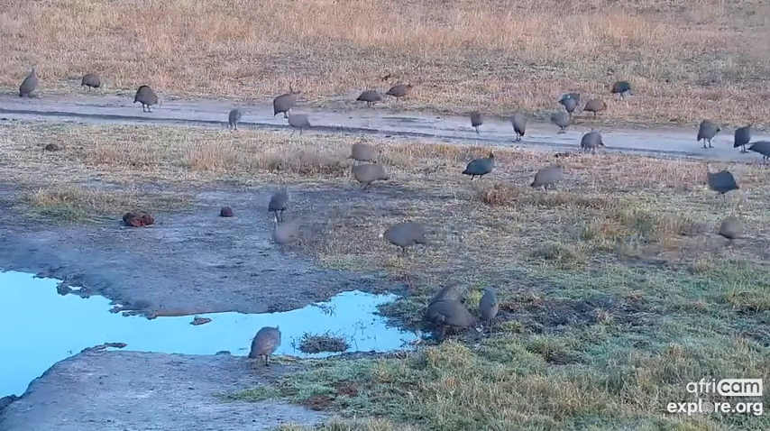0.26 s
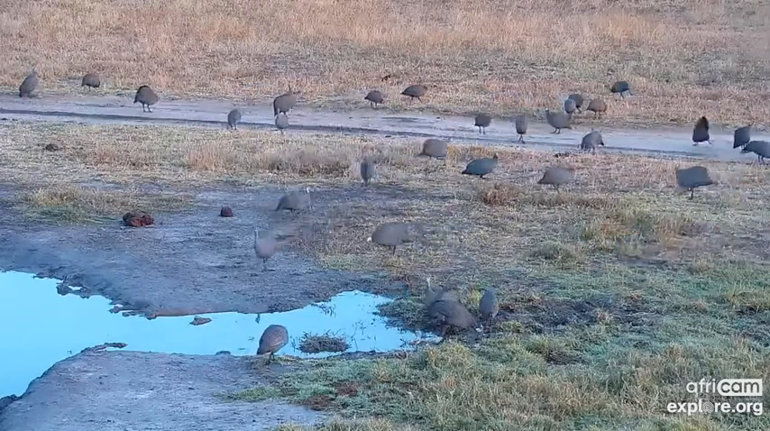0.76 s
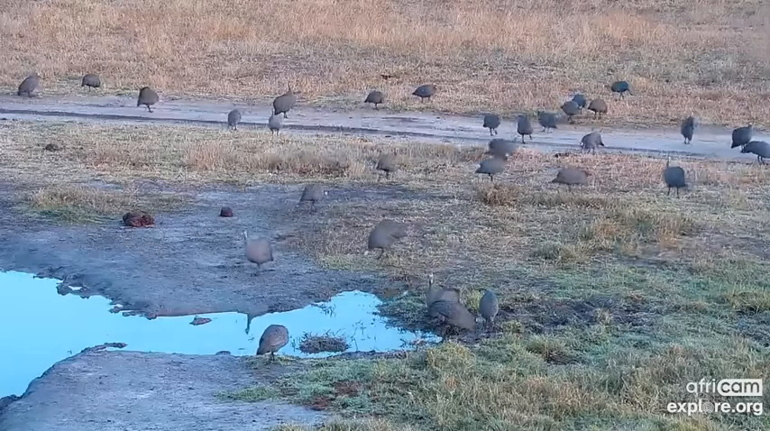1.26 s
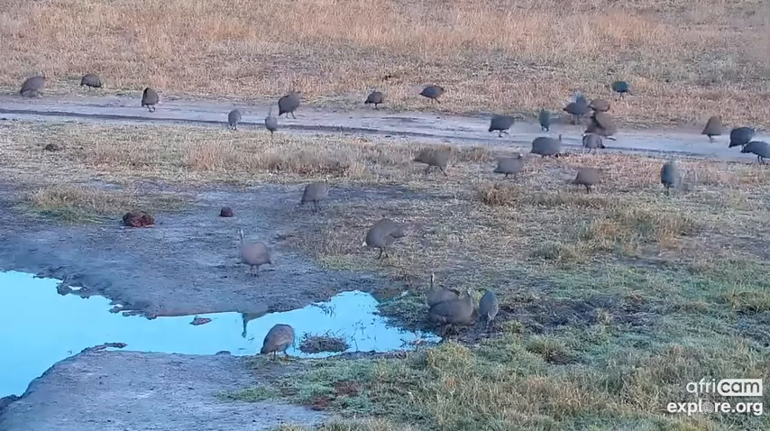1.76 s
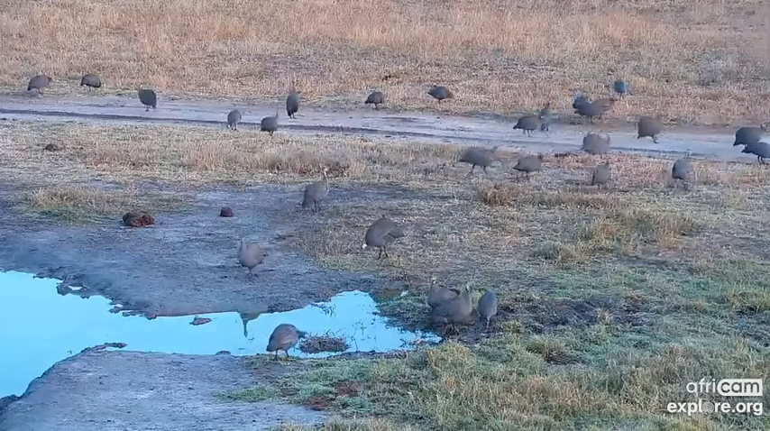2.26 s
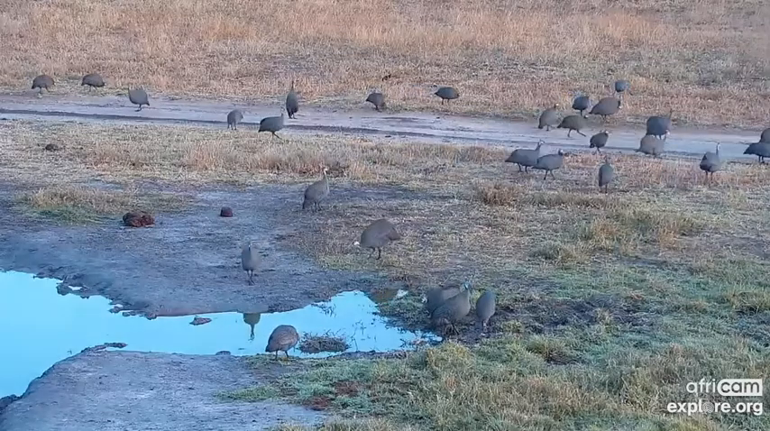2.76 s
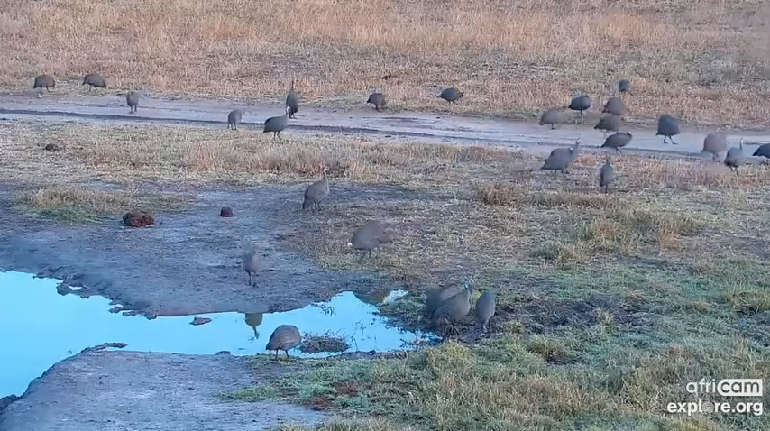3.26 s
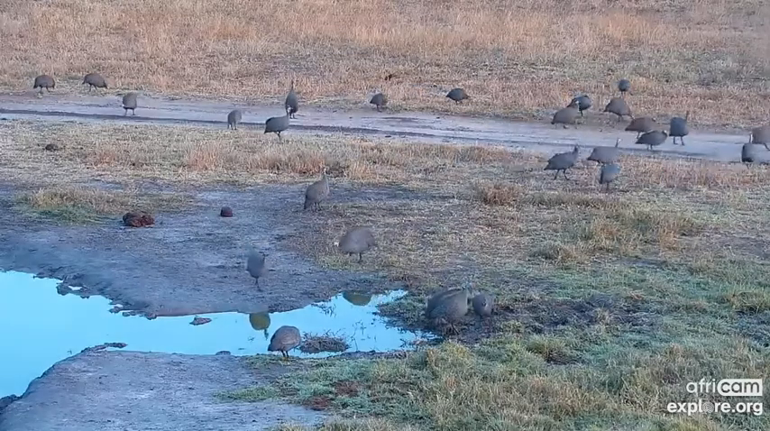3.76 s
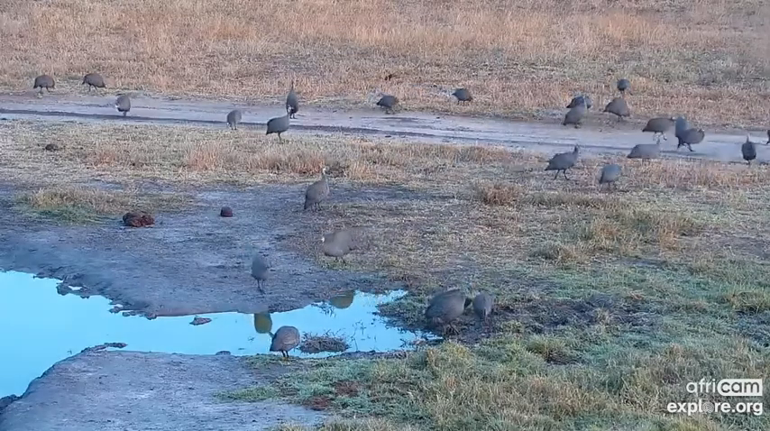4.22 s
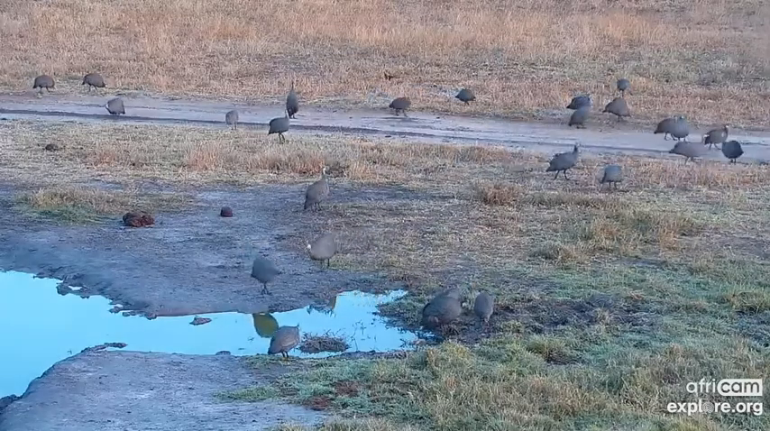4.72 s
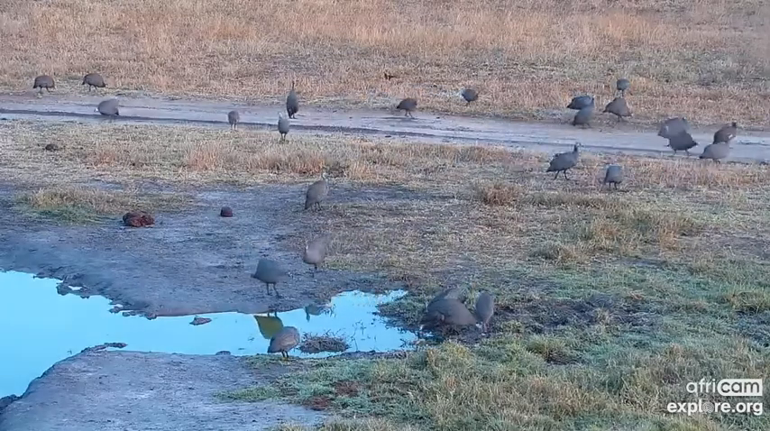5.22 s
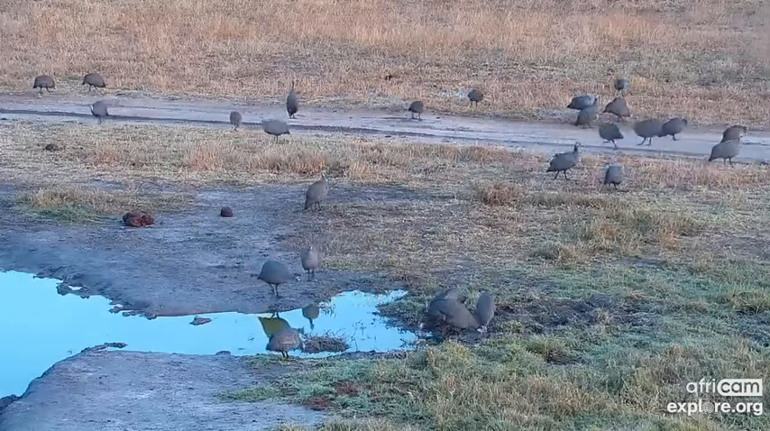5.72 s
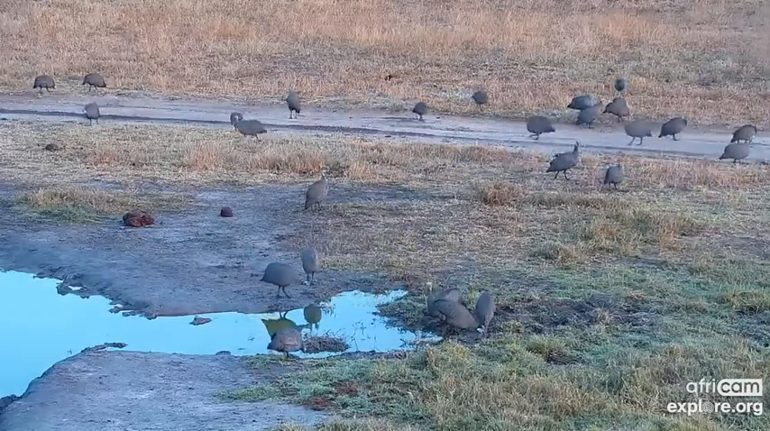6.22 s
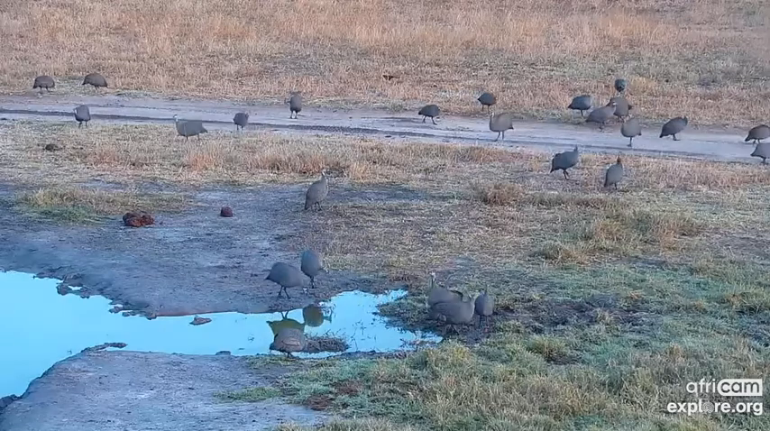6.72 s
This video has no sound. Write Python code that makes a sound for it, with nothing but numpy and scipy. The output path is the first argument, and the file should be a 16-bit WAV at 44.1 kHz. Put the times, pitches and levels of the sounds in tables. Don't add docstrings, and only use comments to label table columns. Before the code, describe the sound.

Open bush with a flock of guineafowl: six evenly spaced harsh chirps from one near bird, a gap filled by small-bird twitter, three more chirps mixed with clucks, then a sparser stretch and one last chirp near the end. Soft sustained calls swell behind. Beaks and feet tick on dry ground, echoes are short and diffuse, and a far motor drones steadily underneath, captured by an outdoor microphone.

```python
import sys
import numpy as np
from scipy import signal
from scipy.fft import rfft, irfft
from scipy.io import wavfile
from scipy.ndimage import uniform_filter1d

SR = 44100
rng = np.random.default_rng(int(sys.argv[2]) if len(sys.argv) > 2 else 0)


def magnitude_from_level(level_db):
    exponent = np.asarray(level_db, float) / 20
    return 10 ** exponent


def bounce(signal):
    frames = np.transpose(np.atleast_2d(signal))
    limited = np.clip(frames, -1, 1)
    pcm = np.round(limited * 32767).astype(np.int16)
    wavfile.write(sys.argv[1], SR, pcm)


N = 307818

# frequency in Hz, gain in dB.
BEAK = [(1000, 0), (9000, 0)]


def at_hz(points, hz):
    points = np.array(points)
    return np.interp(np.log(hz), np.log(points[:, 0]), points[:, 1])


def drift(size, rate):
    r = np.exp(-2 * np.pi * rate / SR)
    settle = 3000
    slow = signal.lfilter([1], [1, -2 * r, r * r], rng.standard_normal(size + settle))[settle:]
    return slow * np.sqrt((1 - r * r) ** 3 / (1 + r * r))


def band(x, low_hz, high_hz):
    return signal.sosfilt(signal.butter(2, [low_hz, high_hz], "band", fs=SR, output="sos"), x)


def add(out, s, sound):
    at = round(s * SR)
    sound, at = sound[max(-at, 0):], max(at, 0)
    out[at:at + len(sound)] += sound[:N - at]


def note(rows, throat, count, wobble, flutter_db, flutter_hz, breath_db, breath_hz):
    s, hz, level_db = np.transpose(rows)
    t = np.arange(s[0], s[-1], 1 / SR)
    pitch = uniform_filter1d(np.interp(t, s, hz), size=90) * (1 + wobble * drift(len(t), 137))
    phase = 2 * np.pi * (np.cumsum(pitch) / SR + rng.random())
    orders = np.arange(1, count + 1)[:, None]
    gains = magnitude_from_level(at_hz(throat, orders * pitch))
    gains = gains / np.sqrt(np.sum(gains ** 2, axis=0))
    flutter = magnitude_from_level(flutter_db * np.array([drift(len(t), flutter_hz) for k in range(count)]))
    cleanness = np.minimum(2 * orders / count, 1) ** 2
    noise = np.array([drift(len(t), breath_hz) for k in range(count)])
    breath = 1 + magnitude_from_level(breath_db) * cleanness * noise
    spread = orders ** 2 * np.pi / count
    tone = np.sqrt(2) * np.sum(gains * flutter * breath * np.sin(orders * phase + spread), axis=0)
    edge = np.clip(np.minimum(t - s[0], s[-1] - t) / 0.0025, 0, 1)
    return tone * edge * np.interp(t, s, magnitude_from_level(level_db / 2)) ** 2


def tick(level_db, low_hz, high_hz, decay_s):
    t = np.arange(2000) / SR
    swell = t / decay_s * np.exp(-t / decay_s)
    return magnitude_from_level(level_db) * band(rng.standard_normal(len(t)) * swell, low_hz, high_hz)


def near_bird():
    # start in seconds, length in seconds, top pitch in Hz, level in dB, sag by the end in dB.
    chirps = [
        (-.008, 0.034, 1872, -11, 9.5),
        (.407, 0.037, 1890, -11.5, 6.5),
        (0.821, 0.041, 1895, -13, 6),
        (1.268, 0.035, 1862, -8.5, 9.5),
        (1.698, 0.038, 1834, -10.5, 6.5),
        (2.116, 0.032, 1795, -10, 5.5),
        (3.474, .026, 1983, -11, 0.5),
        (3.921, 0.032, 1980, -9.5, 1.5),
        (4.331, 0.033, 1902, -10.5, 9.5),
        (6.588, 0.022, 1758, -11.5, -1),
    ]
    # frequency in Hz, gain in dB.
    throat = [(1800, -11), (3700, -5.5), (5400, -1), (6000, -3.5), (7200, -2), (8000, -13), (9200, -16.5),
              (10700, -22), (12000, -6)]
    attack_s, rise_s, drop_s, release_s = 0.0028, 0.009, 0.008, 0.0049
    out = np.zeros(N)
    for s, length, hz, level_db, sag_db in chirps:
        end = s + length
        start_hz = 0.96 * hz
        last_hz = hz * (1 - 3.64 * (length - 0.021))
        rows = [(s, start_hz, level_db - 25),
                (s + attack_s, start_hz, level_db - 2),
                (s + rise_s, 0.99 * hz, level_db + 0.3),
                (s + 0.39 * length, hz, level_db),
                (end - drop_s, 0.594 * hz + 0.3934 * last_hz, level_db - 0.4 * sag_db),
                (end - release_s, last_hz, level_db - sag_db),
                (end, 0.93 * last_hz, level_db - 31)]
        add(out, s, note(rows, throat, count=6, wobble=0.006, flutter_db=2, flutter_hz=160,
                         breath_db=-9, breath_hz=380))
        add(out, end - 0.003, tick(-20, 2000, 4600, 0.0065))
        if 0 < s < 5:
            add(out, s - 0.0125, tick(3.9, 2180, 2500, 0.00068) + tick(-18.5, 3000, 6400, 0.0011))
            add(out, s + 0.00024, tick(-8, 1800, 8200, 0.00096))
    return band(out, 1300, 13000)


def clucks():
    # peak time in seconds, pitch in Hz, level in dB, length in seconds, third harmonic in dB.
    calls = [
        (3.026, 1814, -28.5, 0.015, -7),
        (3.561, 1637, -10, 0.012, -1.5),
        (3.956, 1870, -15, .011, 8),
        (4.206, 1846, -17.5, 0.013, -6),
        (4.302, 1643, -19.5, 0.011, -11),
        (4.808, 1663, -15.5, 0.0096, 5.5),
        (6.031, 1623, -16.5, 0.0087, 4),
        (6.376, 1650, -34, 0.013, -24),
        (6.688, 1630, -18.5, 0.013, -5),
    ]
    # frequency in Hz, gain in dB.
    cluck_throat = [(1700, -4), (3300, -2.5), (5000, 4), (6700, -21), (7400, -3), (7900, -27)]
    out = np.zeros(N)
    for s, hz, level_db, length, third_db in calls:
        throat = [(f, g + third_db * (k == 2)) for k, (f, g) in enumerate(cluck_throat)]
        rows = [(s - 0.45 * length, 1.08 * hz, level_db - 8),
                (s, hz, level_db),
                (s + 0.58 * length, 0.987 * hz, level_db - 4.5),
                (s + 0.5 * length, 0.52 * hz, level_db - 37)]
        add(out, rows[0][0], note(rows, throat, count=5, wobble=0.014, flutter_db=1, flutter_hz=200,
                                  breath_db=-11, breath_hz=900))
    return band(out, 1200, 13000)


def long_notes():
    # start in seconds, length in seconds, pitch in Hz, end level in dB, overtone gain in dB.
    calls = [
        (.44, 0.18, 1860, -44, 2),
        (1.207, 0.29, 1860, -39, 0),
        (2.138, 0.25, 1821, -35.5, 2),
        (3.027, 0.29, 1824, -36.5, -2),
        (4.991, 0.296, 1835, -41, -12),
        (5.884, 0.27, 1840, -37.5, -11),
        (6.797, 0.37, 1810, -32, 1),
    ]
    # frequency in Hz, gain in dB.
    long_throat = [(1850, 2), (3700, -18.5), (5500, -4), (7400, -15.5)]
    out = np.zeros(N)
    for s, length, hz, level_db, overtone_db in calls:
        rows = [(s, 1.045 * hz, level_db - 9),
                (s + 0.013, 1.04 * hz, level_db - 5),
                (s + 0.019, 0.985 * hz, level_db - 10),
                (s + 0.423 * length, 0.995 * hz, level_db - 4.5),
                (s + 0.9 * length, 1.01 * hz, level_db),
                (s + 1.04 * length, 1.015 * hz, level_db - 26)]
        throat = [(f, g + overtone_db * (f > 2 * hz - 500)) for f, g in long_throat]
        add(out, s, note(rows, throat, count=4, wobble=0.002, flutter_db=2.8, flutter_hz=20,
                         breath_db=-19, breath_hz=300))
    return band(out, 1200, 13000)


def ticks():
    # time in seconds, peak level in dB.
    strikes = [(1.072, -32), (1.588, -30), (2.884, -37), (3.043, -30), (3.318, -29), (3.797, -35),
               (3.8987, -32), (3.911, -25), (2.865, -37), (4.19, -30), (4.611, -29), (5.4525, -39),
               (5.562, -32), (6.134, -30), (6.518, -27.5), (6.863, -29.5)]
    out = np.zeros(N)
    for s, level_db in strikes:
        add(out, s - 0.001, tick(level_db + 9.5, 5200, 9800, 0.001))
    return out


def swoops():
    # time of the top in seconds, fall in seconds, top in Hz, level at the top and on the shelf in dB.
    calls = [
        (3.542, 0.015, 4860, -26, -17),
        (6.007, .023, 4950, -31.5, -5.5),
        (6.666, 0.031, 4660, -24.5, -23.5),
    ]
    shelf_hz, drop_hz = 4020, 3300
    out = np.zeros(N)
    for s, fall, top, top_db, db in calls:
        rows = [(s - 0.021, 0.62 * top, top_db - 22),
                (s - 0.009, 0.965 * top, top_db - 8),
                (s - 0.003, top, top_db),
                (s + 0.342 * fall, 0.95 * top, (top_db + db) / 2 - 1),
                (s + 0.404 * fall, shelf_hz, db),
                (s + 0.75 * fall, shelf_hz, db + 1),
                (s + 0.915 * fall, (shelf_hz + drop_hz) / 2, db - 11),
                (s + 0.927 * fall, drop_hz, db - 0.6),
                (s + fall + 0.006, drop_hz, db - 30)]
        add(out, rows[0][0], note(rows, BEAK, count=1, wobble=0.012, flutter_db=1.4, flutter_hz=120,
                                  breath_db=-15, breath_hz=600))
    return out + 0.015 * band(out ** 2, 5500, 11000)


def pipes():
    # start in seconds, length in seconds, hook in Hz, pitch in Hz, level in dB.
    calls = [(0.583, 0.091, 4050, 3690, -31), (0.701, 0.076, 3760, 3620, -32),
             (0.793, 0.098, 4020, 3625, -27), (0.908, 0.072, 4200, 3600, -29.5),
             (1.031, 0.073, 4200, 3670, -30), (4.371, 0.088, 3750, 3664, -30),
             (4.477, 0.075, 3900, 3680, -30.5), (4.58, 0.08, 3710, 3610, -32),
             (4.68, 0.069, 3660, 3510, -34), (4.869, 0.071, 4090, 3650, -33.5),
             (6.696, 0.047, 4110, 3716, -30), (6.728, 0.072, 3660, 3660, -28),
             (6.82, 0.1, 3630, 3610, -30.5), (6.939, 0.081, 3770, 3690, -27)]
    hook_s, sag = 0.0225, 0.011
    return [[(s, hook, db - 8.5),
             (s + hook_s, hz, db),
             (s + 0.63 * length, (1 - sag) * hz, db - 3),
             (s + length, (1 - 3.9 * sag) * hz, db - 44)]
            for s, length, hook, hz, db in calls]


def whistles():
    # start in seconds, length in seconds, from Hz, to Hz, level in dB.
    clear = [(-.01, 0.071, 2602, 2560, -35), (0.541, 0.14, 2096, 2290, -43), (1.18, .05, 2400, 2120, -58),
             (1.225, 0.12, 2100, 2370, -38.5), (0.778, .016, 4200, 4300, -44),
             (2.797, .02, 4800, 4870, -42), (2.379, 0.024, 4150, 4114, -40), (3.682, .032, 3000, 3030, -40),
             (3.713, 0.028, 3000, 2400, -41), (3.816, 0.026, 4550, 4360, -34),
             (4.823, 0.071, 3050, 2980, -47), (4.893, 0.15, 1300, 1280, -56.5),
             (5.164, 0.019, 5150, 5380, -41), (5.335, 0.02, 4550, 4550, -46),
             (6.143, .014, 4700, 6200, -50), (6.364, 0.014, 4000, 3930, -39),
             (6.299, 0.02, 4150, 4070, -38), (6.65, .024, 3500, 4300, -53),
             (1.077, 0.051, 3520, 3130, -36.5), (1.302, 0.056, 3480, 2986, -32),
             (2.401, 0.035, 3005, 3290, -35), (2.362, 0.23, 2730, 2600, -48.5),
             (0.98, 0.041, 3980, 3720, -28), (2.695, 0.13, 1130, 910, -45),
             (3.343, 0.024, 2500, 5300, -45.5), (3.739, .15, 2250, 2400, -46.5),
             (3.955, 0.022, 3600, 3410, -28.5), (4.77, 0.03, 4640, 4320, -33.5),
             (4.921, 0.04, 3520, 2770, -36), (4.958, 0.14, 2680, 2594, -40),
             (5.666, 0.065, 2234, 2384, -40.5), (4.165, 0.091, 3800, 3300, -33.5),
             (6.258, 0.059, 2100, 2147, -44.5), (6.318, 0.14, 2676, 2602, -39),
             (6.347, 0.063, 2220, 2400, -41.5), (6.762, 0.033, 1496, 1615, -45)]
    # start in seconds, length in seconds, from Hz, to Hz.
    faint = [(1.829, 0.037, 3400, 4100), (1.917, 0.045, 5100, 4670), (2.188, 0.053, 5100, 4450),
             (3.07, 0.082, 2300, 2460), (1.855, 0.019, 5100, 6900), (2.8, .025, 3900, 3900),
             (2.0, 0.037, 2700, 2530), (3.9, .05, 3900, 3600), (6.21, 0.037, 3600, 4000),
             (1.387, .1, 3350, 3330), (1.5, 0.13, 3450, 3900), (6.885, .03, 2800, 3600),
             (2.88, 0.053, 6200, 6720), (4.95, .012, 5200, 5500), (5.549, 0.029, 3550, 3580),
             (5.655, 0.039, 2700, 2800), (6.45, 0.027, 4000, 3800)]
    calls = [tuple(row) for row in clear] + [(*row, -51) for row in faint]
    edge = 0.13
    shape = [(0, 9), (edge, 0), (1 - edge, 0), (1, 9)]
    return [[(s + k * length, a + k * (b - a), db - loss) for k, loss in shape]
            for s, length, a, b, db in calls]


def coos():
    # start in seconds, length in seconds, top in Hz, level in dB.
    calls = [
        (2.555, .19, 1860, -44.5),
        (5.788, 0.16, 1906, -47),
    ]
    return [[(s, 0.83 * hz, db - 6),
             (s + 0.271 * length, hz, db),
             (s + 0.4 * length, 0.99 * hz, db),
             (s + 0.78 * length, 0.8 * hz, db),
             (s + length, 0.76 * hz, db - 9)]
            for s, length, hz, db in calls]


def hoots():
    # peak time in seconds, peak level in dB, pitch in Hz, length in seconds.
    calls = [(0.174, -40, 1140, 0.0096), (0.617, -42.5, 1130, 0.011), (1.041, -44, 1116, .012),
             (1.332, -42, 1230, 0.011), (1.363, -47, 1280, 0.01), (1.387, -45, 1290, 0.0125),
             (1.414, -43, 1294, 0.012), (1.447, -42, 1245, 0.013), (1.933, -48, 1890, 0.02),
             (2.488, -42.5, 1276, .03), (2.84, -45, 1850, 0.022), (5.005, -49, 4320, 0.039),
             (5.036, -44, 3700, .03), (5.514, -52, 2780, 0.041), (5.615, -47.5, 2110, 0.028)]
    return [[(s - length / 2, 1.02 * hz, db - 5),
             (s, hz, db),
             (s + length / 2, 0.98 * hz, db - 5)]
            for s, db, hz, length in calls]


def falls():
    # start in seconds, length in seconds, from Hz, to Hz, peak level in dB.
    calls = [(0.273, 0.02, 4540, 4080, -35.5), (0.287, 0.014, 1970, 1870, -37),
             (0.516, 0.047, 3730, 2700, -47), (4.186, 0.02, 5440, 4830, -30),
             (4.189, 0.021, 4300, 3940, -31), (4.278, 0.027, 4500, 3970, -40),
             (4.47, 0.021, 4900, 3800, -48), (1.358, .018, 3080, 2560, -36), (2.333, .018, 5200, 4280, -40),
             (3.838, 0.014, 4100, 3720, -32.5), (5.14, 0.019, 4800, 4220, -42),
             (5.182, 0.02, 5350, 4470, -37), (5.3, .018, 4950, 4450, -41), (5.27, .025, 3420, 3100, -51),
             (6.152, 0.034, 3980, 3380, -47.5), (2.559, 0.033, 3300, 2770, -30),
             (2.574, 0.025, 4205, 3600, -14), (2.598, 0.028, 3900, 3430, -34.5),
             (2.786, 0.03, 4970, 3990, -33), (2.88, 0.031, 1655, 1658, -33.5),
             (2.995, 0.057, 5340, 3520, -36.5), (3.367, .017, 5200, 3600, -49),
             (3.373, 0.088, 3220, 2360, -35.5), (3.638, 0.012, 2770, 2670, -33.5),
             (3.612, 0.03, 4100, 2460, -41.5), (3.675, 0.023, 4110, 2900, -39.5),
             (3.824, 0.019, 5100, 4220, -24), (3.892, 0.03, 4210, 3870, -34.5),
             (3.988, 0.025, 3500, 3000, -30), (4.151, 0.033, 4950, 3800, -41),
             (4.787, 0.037, 4440, 3300, -29.5), (5.08, 0.028, 5100, 3750, -31.5),
             (6.295, 0.026, 5290, 3940, -26.5), (6.927, 0.025, 4830, 3690, -25.5)]
    return [[(s, a, db - 10),
             (s + 0.42 * length, a + 0.61 * (b - a), db),
             (s + length, b, db - 17)]
            for s, length, a, b, db in calls]


def flicks():
    # time of the top in seconds, slide in seconds, top in Hz, end in Hz, level in dB.
    calls = [(0.573, 0.02, 3200, 2930, -38), (0.947, 0.065, 5280, 3960, -35),
             (2.498, 0.015, 4200, 3000, -41), (5.831, 0.019, 4640, 3900, -47.5),
             (2.369, 0.0099, 3640, 3400, -37), (2.391, 0.015, 4120, 3100, -33),
             (2.526, 0.0076, 3640, 3880, -34.5), (2.542, 0.018, 4060, 3490, -30.5),
             (2.57, 0.0123, 4260, 3940, -19.5), (5.161, 0.052, 4090, 3140, -32),
             (5.225, 0.023, 3740, 2730, -31), (5.327, 0.045, 4640, 3040, -30),
             (5.391, 0.024, 3770, 2750, -33.5)]
    flick_s = 0.014
    return [[(s - flick_s, 0.75 * top, db - 8),
             (s - 0.325 * flick_s, 0.96 * top, db - 4.5),
             (s, top, db),
             (s + 0.42 * slide, top + 0.74 * (end - top), db - 6.5),
             (s + slide, end, db - 6)]
            for s, slide, top, end, db in calls]


def small_birds():
    far, close = np.zeros(N), np.zeros(N)
    for rows in pipes() + whistles() + coos():
        add(far, rows[0][0], note(rows, BEAK, count=1, wobble=0.003, flutter_db=2.5, flutter_hz=40,
                                  breath_db=-14, breath_hz=300))
    for rows in falls() + flicks():
        place = close if rows[1][2] > -23 else far
        add(place, rows[0][0], note(rows, BEAK, count=1, wobble=0.011, flutter_db=2.6, flutter_hz=90,
                                    breath_db=-9, breath_hz=450))
    for rows in hoots():
        add(far, rows[0][0], note(rows, BEAK, count=1, wobble=0.003, flutter_db=1.5, flutter_hz=50,
                                  breath_db=-23, breath_hz=300))
    return [x + 0.06 * band(x ** 2, 5000, 11000) for x in (far, close)]


def rasps():
    # start in seconds, length in seconds, from Hz, to Hz, level in dB.
    calls = [
        (1.348, 0.097, 6860, 7300, -55.5),
        (1.6, 0.096, 6250, 7000, -54),
        (2.47, 0.19, 6280, 7230, -53.5),
        (6.144, .054, 6100, 6800, -49),
    ]
    buzz_hz = 190
    out = np.zeros(N)
    for s, length, a, b, db in calls:
        rows = [(s, a, db - 5), (s + 0.7 * length, a + 0.75 * (b - a), db), (s + length, b, db - 3)]
        tone = note(rows, BEAK, count=1, wobble=0.012, flutter_db=3, flutter_hz=60,
                    breath_db=-6, breath_hz=500)
        t = np.arange(len(tone)) / SR
        add(out, s, tone * (1 + np.sin(2 * np.pi * buzz_hz * t)))
    return out


def grass():
    # time of the middle in seconds, length in seconds, level in dB.
    steps = [
        (0.245, .05, -50.5),
        (2.799, 0.03, -46),
        (2.892, 0.079, -43),
        (3.03, 0.038, -48),
        (3.297, 0.039, -50),
        (3.83, 0.055, -49),
        (4.197, 0.028, -33),
        (4.797, 0.022, -34),
        (4.995, 0.016, -42),
        (6.313, 0.024, -46),
    ]
    t = np.arange(N) / SR
    swell = np.zeros(N)
    for s, length, level_db in steps:
        swell += magnitude_from_level(level_db) * np.exp(-((t - s) / length) ** 2 * 2)
    clicks = (rng.random(N) < 2500 / SR) * rng.standard_normal(N) * magnitude_from_level(3.7 * drift(N, 90))
    crackle = band(clicks, 2100, 9900)
    return swell * crackle / crackle.std()


def open_ground(x, near_db, far_db):
    t = np.arange(round(SR / 2)) / SR
    sparse = (rng.random(len(t)) < 350 / SR) * magnitude_from_level(near_db - 60 * t / 0.17)
    haze = magnitude_from_level(far_db - 60 * t / 0.49)
    scatter = rng.standard_normal(len(t)) * (sparse + haze) * (t > 0.005)
    return x + band(signal.fftconvolve(x, scatter)[:N], 870, 4170)


def generator():
    # multiple of the engine cycle, level in dB rms.
    engine = [(4, -48.5), (5, -47.5), (6, -30), (7, -54), (8, -50), (9, -46.5), (11, -45.5), (12, -43.5),
              (15, -55.5), (16, -60), (24, -60.5)]
    # frequency in Hz, level in dB rms.
    whine = [(446.6, -58.5), (669.9, -55), (893.3, -53)]
    cycle_hz = 12.733
    turns = np.cumsum(1 + 0.000574 * drift(N, 1.05)) / SR
    lines = [(k * cycle_hz, level_db) for k, level_db in engine] + list(whine)
    out = np.zeros(N)
    for hz, level_db in lines:
        level = np.sqrt(2) * magnitude_from_level(level_db + 0.5 * drift(N, 10))
        out += level * np.sin(2 * np.pi * (hz * turns + rng.random()))
    return out


def air():
    # frequency in Hz, spectral density in dB per Hz.
    spectrum = [(25, -17.5), (40, -12.5), (100, -5), (160, -13), (220, -13.5), (390, -13), (650, -19),
                (930, -21.5), (1150, -31.5), (1620, -27.5), (1800, -33), (4000, -33.5), (9000, -36),
                (11000, -38.5)]
    # centre in Hz, width in Hz, level in dB.
    chorus = [
        (2550, 730, -55.5),
        (3600, 220, -61),
        (4700, 59, -67.5),
        (5220, 800, -62),
    ]
    hz = np.maximum(np.fft.rfftfreq(N, 1 / SR), 10)
    still = irfft(rfft(rng.standard_normal(N)) * magnitude_from_level(at_hz(spectrum, hz)), N)
    out = magnitude_from_level(-38.5) * still / still.std()
    for centre_hz, width_hz, level_db in chorus:
        blur = band(rng.standard_normal(N), centre_hz - width_hz / 2, centre_hz + width_hz / 2)
        out = out + magnitude_from_level(level_db + 2.5 * drift(N, 9)) * blur / blur.std()
    return out


def scene():
    near = open_ground(near_bird() + clucks() + long_notes() + ticks(), near_db=-26.5, far_db=-57.5)
    distant, close = small_birds()
    middle = open_ground(swoops() + close, near_db=-29, far_db=-66)
    far = open_ground(distant, near_db=-14, far_db=-43.5)
    return (near + middle + far + rasps() + grass() + generator() + air())[None]


def band_limit(x):
    return signal.sosfilt(signal.butter(12, 11800, fs=SR, output="sos"), x)


def record(dry):
    rounded = 1.02 * np.tanh(dry / 1.02)
    top_cut = signal.cheby2(14, 60, 11850, fs=SR, output="sos")
    mix = signal.sosfilt(top_cut, rounded)
    return band_limit(mix)


dry = scene()
out = record(dry)
bounce(out)
```